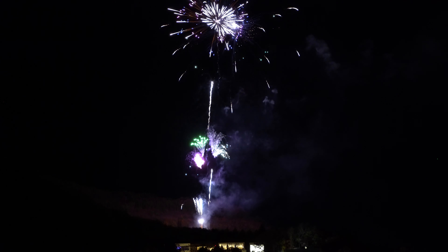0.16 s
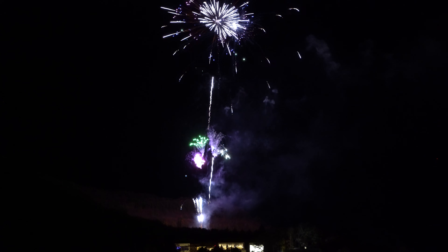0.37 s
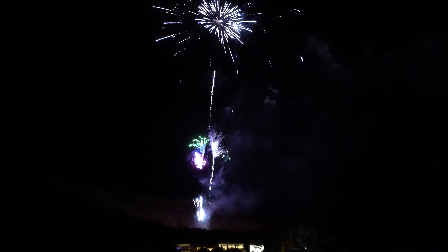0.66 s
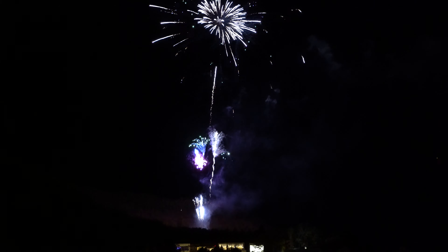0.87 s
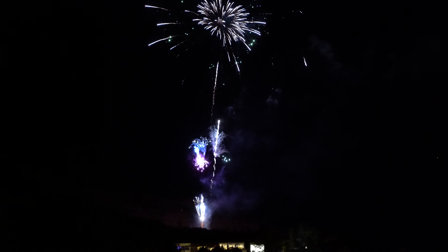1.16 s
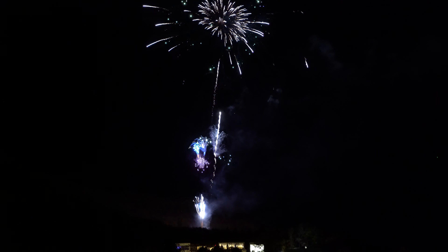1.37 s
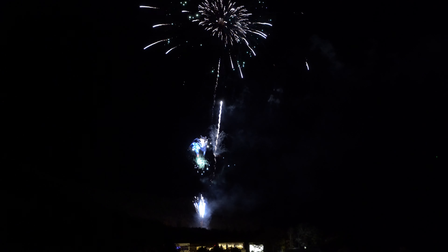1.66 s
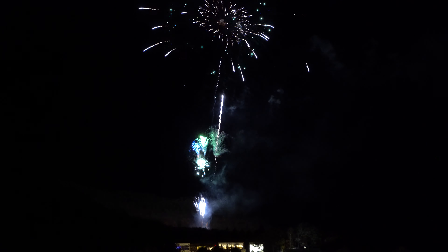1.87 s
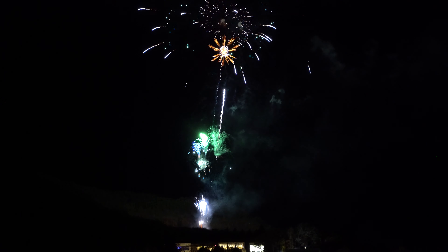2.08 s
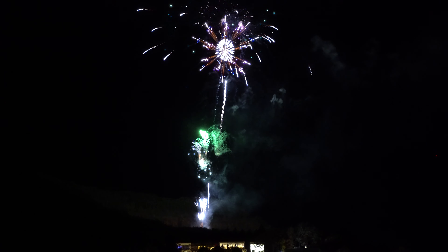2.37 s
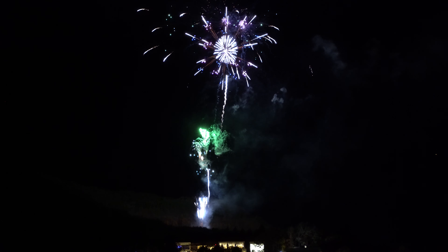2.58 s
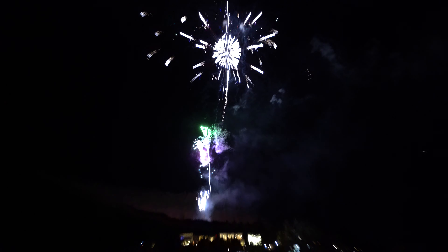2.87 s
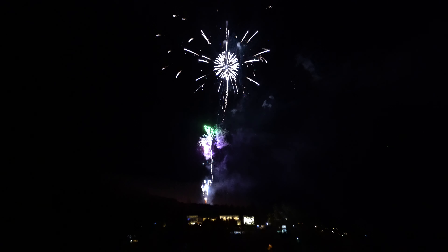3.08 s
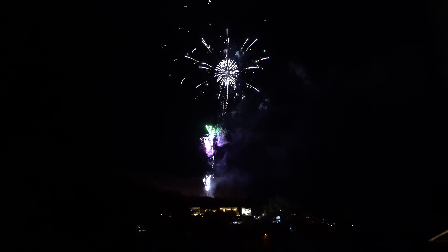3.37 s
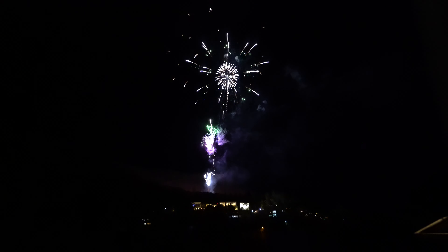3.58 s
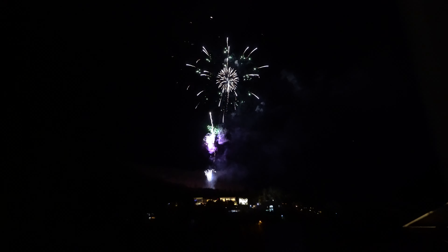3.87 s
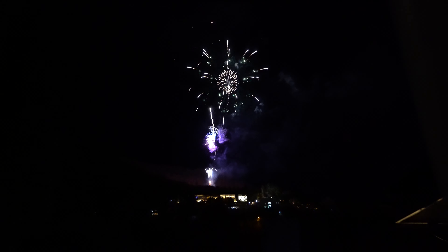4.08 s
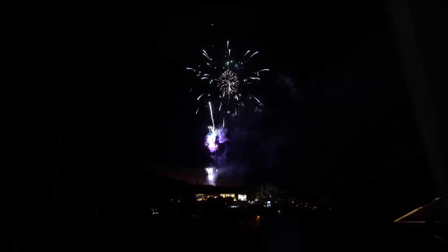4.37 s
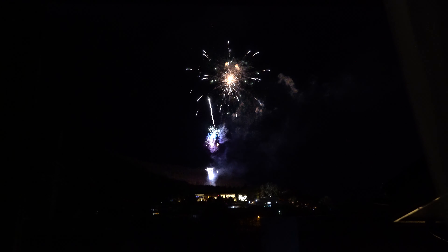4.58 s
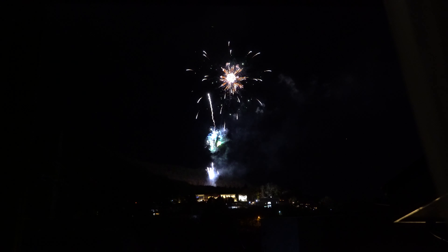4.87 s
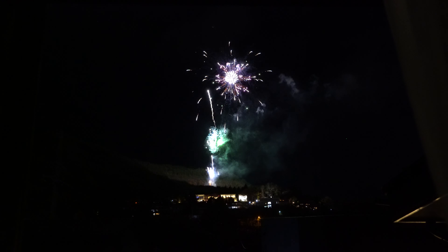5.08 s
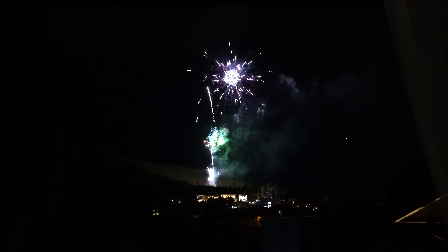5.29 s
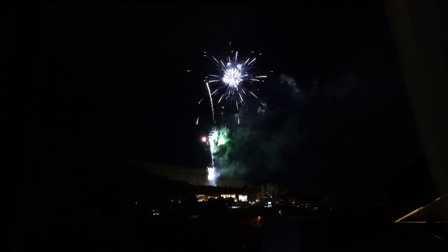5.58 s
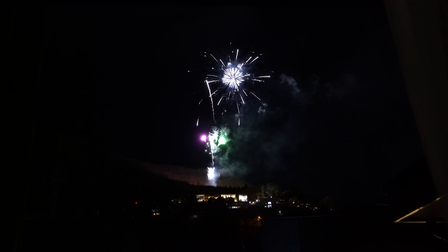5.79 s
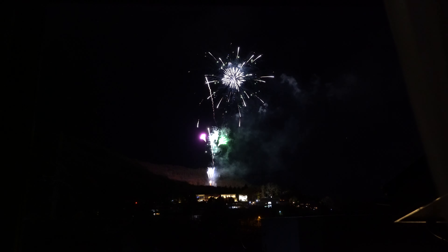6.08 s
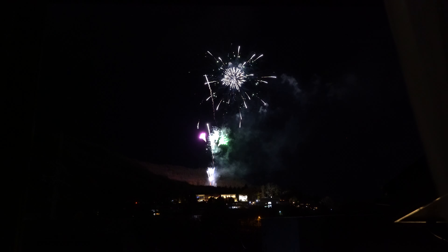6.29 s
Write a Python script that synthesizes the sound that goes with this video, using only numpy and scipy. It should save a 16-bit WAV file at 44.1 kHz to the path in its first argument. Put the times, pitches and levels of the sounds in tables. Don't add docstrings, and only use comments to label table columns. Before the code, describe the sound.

A loud dull firework report, then a dozen more over six seconds, strong and weak, with faint pops between. Three are big, chesty booms with slight crackle and long valley echoes. Low mortar thumps and soft airy rushes of climbing shells lie underneath, with a barely audible deep hum. Outdoors, far away, on a walled balcony; the handheld recorder picks up faint rubbing and slightly saturates on peaks.

```python
import sys
import numpy as np
from scipy import signal
from scipy.io import wavfile
from scipy.ndimage import uniform_filter1d

SR = 44100
rng = np.random.default_rng(int(sys.argv[2]) if len(sys.argv) > 2 else 0)


def invert_db(x):
    u = np.asarray(x, float) / 20
    return 10 ** u


def dump(signal):
    limited = np.clip(np.atleast_2d(signal).T, -1, 1)
    pcm = np.round(limited * 32767).astype(np.int16)
    wavfile.write(sys.argv[1], SR, pcm)


N = 284180
TIME = np.arange(N) / SR


def evened(x):
    return x / np.sqrt(np.mean(x ** 2) + 1e-20)


def steadied(x, span_s):
    power = uniform_filter1d((x ** 2).mean(0), round(span_s * SR))
    return evened(x / (power + 1e-3) ** 0.35)


def read(points, hz):
    f, value = np.transpose(points)
    return np.interp(np.log(hz + 1), np.log(f + 1), value)


def add(mix, s, sound):
    part = mix[round(s * SR):][:len(sound)]
    part += sound[:len(part)]


def sides(pan_db):
    return invert_db([pan_db / 2, -pan_db / 2])


def noise(colour, same, patchy_db, lean=((1, 0), (2, 0)), size=512):
    frames, hz = N * 2 // size + 5, np.fft.rfftfreq(size, 1 / SR)
    a, b, c, d, patches = rng.standard_normal((frames, len(hz), 5)).T
    patches = uniform_filter1d(patches, size=size // 100, axis=0)
    patches = evened(uniform_filter1d(patches, size=2, axis=1))
    like = np.clip(same * np.ones(len(hz)), -1, 1)[:, None]
    left = a + 1j * b
    right = like * left + np.sqrt(1 - like ** 2) * (c + 1j * d)
    z = np.array([left, right])
    z *= invert_db(read(colour, hz)[:, None] + patchy_db * patches)
    z *= sides(read(lean, hz))[:, :, None]
    window = np.sin(np.pi * (np.arange(size) + .5) / size)
    return evened(signal.istft(z, window=window, nperseg=size, noverlap=size // 2)[1][:, :N])


def stroke(start, top, end, db):
    away = np.where(TIME < top, (top - TIME) / (top - start), (TIME - top) / (end - top))
    return invert_db(db - 16.5 * np.minimum(away, 4) ** 1.72)


def bursts():
    # (time [s], peak [dB], blast length [ms], ground echo delay [ms], hill echo [dB])
    reports = [(0.5363, -13.5, 1.5, 0.62, -32), (0.8218, -2, 0.83, 2.38, -10),
               (1.1983, -3.5, 1.5, 0.37, -24.5), (1.9447, 2, 1.22, 0.22, -22),
               (2.9786, -12, 0.87, 1.72, -24.5), (3.0314, -14.5, 1.2, 0.48, -39),
               (3.5385, -4.5, 0.52, 1.44, -10.5), (4.0335, -3.5, 0.71, 0.7, -22.5),
               (5.0961, -3, 0.61, 1.39, -23.5), (5.535, -20.5, 0.73, 1.7, -29),
               (5.89, -1, 0.55, 3.35, -10.5), (6.2538, -5.5, 1.28, 0.84, -22)]
    # (time [s], peak [dB], blast length [ms], ground echo delay [ms])
    pops = [(.2255, -44.5, 0.48, 0.97), (0.502, -30, 1.4, 1.4), (0.648, -39, 1.1, 1.2),
            (1.7042, -36, 1, 0.7), (1.9229, -24, 1.4, 1.4), (2.328, -34.5, 0.14, 0.23),
            (2.5001, -25.5, 2.2, 0.83), (3.9187, -23.5, 0.98, 0.47), (4.5, -23, 1.8, 0.68),
            (4.587, -29.5, 0.79, 0.89), (4.6387, -26, 1.5, 0.97), (4.7154, -28, 2.2, 2.4),
            (5.254, -31, 1.6, 1.24), (5.5038, -25.5, 1.6, 1.3)]
    return sorted(reports + [(*pop, -23 + .52 * pop[1]) for pop in pops])


def echo_power(layer, column, hills_db):
    # (delay [s], spread [s], middle [dB], low [dB], treble [dB])
    hills = [(0.094, 0.028, -35.5, -25, -38), (.16, 0.023, -41, -33, -46.5), (.24, .035, -49.5, -35.5, -48),
             (0.359, 0.043, -42.5, -32, -56.5)]
    slap_db, slap_t60, valley_db, valley_t60, loss = layer
    t = np.arange(2 * SR) / SR
    shape = invert_db(2 * (slap_db - 60 * t / slap_t60)) + invert_db(2 * (valley_db - 60 * t / valley_t60))
    for hill in hills:
        shape = shape + invert_db(2 * (hill[column] + hills_db)) * np.exp(-((t - hill[0]) / hill[1]) ** 2)
    shape = shape * np.minimum(t / .025, 1) ** 2 * np.minimum((2 - t) / .5, 1) ** 2
    power = np.zeros(N)
    for s, *_, echo_db in bursts():
        add(power, s, invert_db(2 * (1 + loss) * (echo_db + 10)) * shape)
    return power


def far_noise(colour, patchy_db):
    same = [(60, 0.97), (180, 1), (550, 0.91), (1650, 0.85), (4970, 0.34), (15000, 0.26)]  # (pitch [Hz], left-right likeness [0-1])
    lean = [(60, 2), (240, -0.5), (950, -1.0), (3770, -4), (15000, 7)]  # (pitch [Hz], left-right difference [dB])
    return noise(colour, read(same, np.fft.rfftfreq(1024, 1 / SR)), patchy_db, lean=lean, size=1024)


def hum():
    level = [(0.0, -51.5), (6.44, -52)]  # (time [s], level [dB])
    return np.sqrt(2) * invert_db(np.interp(TIME, *np.transpose(level))) * np.sin(2 * np.pi * 44.2 * TIME)


def roll_level():
    level = [(0, -48), (.11, -54), (.32, -55.5), (.53, -59), (1.5, -52), (1.9, -49), (2.14, -51.5),
             (2.37, -55), (2.55, -55), (2.96, -53.5), (3.15, -55), (4.2, -50), (4.55, -48), (4.73, -47),
             (4.9, -46.5), (5.2, -54), (5.5, -60), (6.44, -44)]
    return np.interp(TIME, *np.transpose(level))


def far_roll():
    middle_colour = [(76, -36), (130, -12), (150, -21), (178, 0), (248, -1), (284, -6.5), (442, -0.5),
                     (543, -5.5), (719, -14.5), (800, -13), (1040, -27), (1760, -120)]
    treble_colour = [(410, -44.5), (700, -11.5), (798, -1.5), (904, -6.5), (1070, -5), (1160, -11),
                     (1710, -14), (1960, -21.5), (2340, -33), (2540, -47), (2900, -43), (3770, -82.5),
                     (6380, -120)]
    # (close slap [dB], slap t60 [s], valley [dB], valley t60 [s], extra loss [dB per dB smaller shell])
    old_middle = (-44.5, 3.7, -42, 4, -0.14)
    old_treble = (-42, 0.1, -46.5, 5, -0.06)
    roll_db = roll_level()
    middle = echo_power(old_middle, column=2, hills_db=-4.5) + invert_db(2 * roll_db)
    treble = echo_power(old_treble, column=4, hills_db=-2.0) + invert_db(2 * (-59 + roll_db + 51.5))
    out = np.sqrt(middle) * far_noise(middle_colour, patchy_db=3.0)
    return out + np.sqrt(treble) * far_noise(treble_colour, patchy_db=1.5)


def rumble():
    colour = [(15, -35), (25, -8), (43, 4.5), (65, 5), (90, 8.5), (124, -7.5), (140, -26), (180, -44),
              (310, -120)]
    # (close slap [dB], slap t60 [s], valley [dB], valley t60 [s], extra loss [dB per dB smaller shell])
    thud = (-42.5, 0.5, -38, 3.5, 0.5)
    old_rumble = (-46.5, 1, -38.5, 3, -0.16)
    # (start [s], loudest [s], end [s], level [dB])
    mortars = [
        (1.4, 1.6, 1.9, -47),
        (2.0, 2.08, 2.3, -47.5),
        (4.15, 4.35, 4.55, -46),
        (3.03, 3.066, 3.16, -46),
        (4.517, 4.65, 4.8, -40.5),
        (4.85, 4.915, 5.0, -46.5),
        (5.52, 5.56, 5.62, -43),
        (6.154, 6.21, 6.28, -34),
    ]
    power = echo_power(thud, column=3, hills_db=-0.6) + echo_power(old_rumble, column=3, hills_db=-23.5)
    power = power + sum(stroke(*row) ** 2 for row in mortars)
    power = power + invert_db(2 * (-63.5 + 1.3 * (roll_level() + 51)))
    return np.sqrt(power) * steadied(noise(colour, 1.0, patchy_db=1.3, size=4096), 0.038)


def rub(rows, sound):
    return np.sqrt(sum((stroke(*row[:4]) * sides(row[4])[:, None]) ** 2 for row in rows)) * sound


def sleeve():
    # (start [s], hardest [s], end [s], level [dB], left-right difference [dB])
    brushes = [
        (-.6, .1, 1.2, -78, -1.7),
        (4.8, 5.1, 5.4, -80.5, -5),
        (5.1, 5.44, 5.62, -68, -1.5),
        (5.5, 5.6, 5.75, -69, 2),
        (5.6, 5.85, 6.15, -59, 3.5),
        (5.85, 6.1, 6.42, -61.5, 2),
    ]
    colour = [(1410, -36.5), (2400, 2), (3130, -3.5), (3990, -3), (4710, -5), (7770, -8), (10300, -10.5),
              (11100, -10), (15600, -17.5)]
    return rub(brushes, noise(colour, 0.26, patchy_db=2.5, size=256))


def cracks():
    # (delay [ms], level [dB], sign and strength [-1 to 1])
    walls = [(2.11, -9, 0.55), (4.675, -12.5, -0.86), (7.87, -12.5, -0.81), (11.74, -13, -0.065),
             (17.09, -15, -1), (24.36, -25.5, 0.68), (89.3, -26, 0.65)]
    out, t = np.zeros(N), np.arange(2000) / SR * 1000
    spread = rng.uniform(.9, 1.1, (len(bursts()), len(walls)))
    for (s, db, length, ground, *_), shifts in zip(bursts(), spread):
        length = max(length, .1)
        u = t / length
        blast = invert_db(db + 2.0) * (1 - u) * np.exp(-u * 1.05)
        blur = np.exp(-.5 * ((t[:80] - t[30]) / (.105 * length)) ** 2)
        blast = np.convolve(blast, blur / blur.sum())[20:len(t) + 20]
        blast = blast - .9 * np.roll(blast, round(ground * SR / 1000))
        add(out, s, blast)
        for (delay, wall_db, sign), shift in zip(walls, shifts):
            add(out, s + delay * shift / 1000, sign * invert_db(wall_db) * blast)
    return out


def balcony(x):
    modes = [(250, -19, 0.076), (461, -16.5, 0.025), (990, -38, 0.11)]
    t = np.arange(SR // 8) / SR
    ring = np.zeros(len(t))
    for hz, db, t60 in modes:
        ring += invert_db(db - 60 * t / t60) * 2 * np.pi * hz / SR * np.sin(2 * np.pi * hz * t)
    return x + signal.oaconvolve(x, ring)[:N]


def through_air(x):
    loss = [(20, -28.5), (60, -2.5), (105, 0.5), (150, -10), (210, -4.5), (1200, -2.5), (1900, -3.5),
            (2400, -17.5), (3200, -23), (4500, -45), (7000, -66.5), (20000, -83)]
    log_gain = np.log(invert_db(read(loss, abs(np.fft.fftfreq(8192, 1 / SR)))))
    taps = np.fft.ifft(np.exp(np.conj(signal.hilbert(log_gain)))).real[:2048]
    return signal.oaconvolve(x, taps)[:N]


def roar():
    colour = [(100, -32), (175, 2), (214, -1.5), (254, 5.5), (348, -9.5), (437, -3.5), (710, -10),
              (777, -8.5), (850, -14.5), (941, -10), (1210, -14.5), (2050, -26), (2600, -43.5), (3380, -65),
              (5720, -120)]
    # (close slap [dB], slap t60 [s], valley [dB], valley t60 [s], extra loss [dB per dB smaller shell])
    layer = (-12, 0.1473, -31.5, 1.97, -0.08)
    power = echo_power(layer, column=2, hills_db=-1.7)
    return np.sqrt(power) * steadied(far_noise(colour, patchy_db=1.54), 0.041)


def fizz():
    colour = [(900, -26), (1500, 4.5), (2000, -1.5), (2600, -5.5), (3500, -23.5), (4800, -41), (7000, -70),
              (9000, -110)]
    # (close slap [dB], slap t60 [s], valley [dB], valley t60 [s], extra loss [dB per dB smaller shell])
    layer = (-22.5, 0.0839, -45.5, 1.59, 0.66)
    return np.sqrt(echo_power(layer, column=4, hills_db=-9)) * far_noise(colour, patchy_db=1.8)


def climbing_shells():
    # (start [s], full [s], end [s], level [dB])
    climbs = [
        (0.59, 0.77, 1.05, -47),
        (3.155, 3.242, 4.24, -45.5),
        (5.64, 5.77, 6.3, -43.5),
    ]
    colour = [(230, -29), (390, -4), (500, -1.5), (660, -12), (870, -5), (1400, -13), (2000, -21.5),
              (2700, -61.5)]
    return np.sqrt(sum(stroke(*row) ** 2 for row in climbs)) * far_noise(colour, patchy_db=1.5)


def fingers():
    # (start [s], hardest [s], end [s], level [dB], left-right difference [dB])
    slides = [
        (.6, .77, .83, -78.5, -6.5),
        (1.85, 1.93, 1.975, -80.5, -8.5),
        (2.032, 2.068, 2.112, -57.5, -10.5),
        (2.1, 2.17, 2.27, -72.5, -11.5),
        (2.385, 2.432, 2.5, -72.5, -8.5),
        (2.525, 2.56, 2.62, -70.5, -9.5),
        (2.575, 2.625, 2.645, -59.5, -11),
        (2.63, 2.69, 2.78, -73.5, -15),
        (2.85, 2.97, 3.22, -72, -0.5),
    ]
    colour = [(1350, -30), (2300, 1.5), (2390, 3.5), (2570, -2), (3410, -3.5), (4000, -8.5), (7230, -12.5),
              (9100, -11), (9890, -2.5), (11300, -1), (15600, -10)]
    # (time [s], peak [dB], left-right difference [dB])
    ticks = [
        (2.0354, -57, -15),
        (2.3818, -60.5, -5),
        (2.461, -51.5, -10),
        (2.5384, -72.5, -7.5),
        (2.7292, -65, -15),
        (3.5093, -60, -5),
        (4.605, -61, 10),
    ]
    out = rub(slides, noise(colour, 0.26, patchy_db=4.0, size=256))
    t = np.arange(100) / SR
    for s, db, pan_db in ticks:
        tick = invert_db(db - 1.5) * np.exp(-t / 0.00043) * np.sin(2 * np.pi * 12500 * t)
        for side, gain in zip(out, sides(pan_db)):
            add(side, s, gain * tick)
    return out


def booms():
    # (time [s], swing [dB], swing pitch [Hz], swings last [ms], crackle [dB])
    shells = [
        (0.82, -5.5, 65.5, 21.5, -27),
        (3.5375, -5, 63.5, 26, -22),
        (5.8908, -4, 72, 27, -19),
    ]
    out, t = np.zeros(N), np.arange(SR // 8) / SR
    grits = rng.standard_normal((len(shells), len(t)))
    for (s, db, hz, last, crackle_db), grit in zip(shells, grits):
        swell = .25 * np.exp(-t / .04) + .8 / (1 + (t * 1000 / last) ** 8)
        swell = swell * (.7 + .3 * np.minimum(t / .012, 1))
        turns = hz * t + .25 * (1 - np.exp(-t / .003))
        fade = np.minimum(len(t) / SR - t, .03) / 0.041
        add(out, s, invert_db(db) * swell * np.sin(2 * np.pi * turns) * fade)
        crackle = grit - np.roll(grit, 16)
        add(out, s, invert_db(crackle_db) * 2.38 * np.exp(-t / 0.02) * crackle)
    return out


def flutters():
    knocks = [(.8232, -1, 270, .03), (3.033, -20.5, 825, 0.05), (3.215, -32, 812, 0.093),
              (3.245, -32, 828, 0.088), (3.325, -35.5, 495, 0.2), (3.5394, -2.5, 1016, 0.022),
              (4.641, -29.5, 990, 0.07), (4.66, -26.5, 262, 0.19), (5.099, -13.5, 240, 0.086),
              (5.534, -26, 432, 0.053), (5.548, -26.5, 994, 0.043), (5.894, -34, 1400, 0.017)]
    out, t = np.zeros(N), np.arange(SR // 5) / SR
    for s, db, hz, t60 in knocks:
        rise = np.minimum(t / (0.096 * t60), 1)
        add(out, s, -invert_db(db - 60 * t / t60) * np.sin(2 * np.pi * hz * t) * rise)
    return out


def scene():
    direct = through_air(balcony(cracks()) + booms() + flutters())
    late = np.roll(direct, 40) - np.roll(direct, 95)
    blasts = direct * sides(-.8)[:, None] + 0.093 * late * np.array([[-1], [1]])
    echoes = far_roll() + rumble() + roar() + fizz()
    return blasts + echoes + climbing_shells() + hum() + sleeve() + fingers()


def self_noise():
    colour = [(2650, -22), (4500, 1), (5510, -2), (7460, -2), (8140, -2.5), (15600, -6.5)]  # (pitch [Hz], level [dB per Hz])
    return invert_db(-85.5) * noise(colour, 0.065, patchy_db=-1.5)


def top_cut(x):
    return signal.sosfilt(signal.butter(12, 15760, fs=SR, output="sos"), x)


def record(dry):
    dry = dry / (1 + (dry / .75) ** 6) ** (1 / 6)
    return top_cut(dry + self_noise())


dry = scene()
out = record(dry)
dump(out)
```